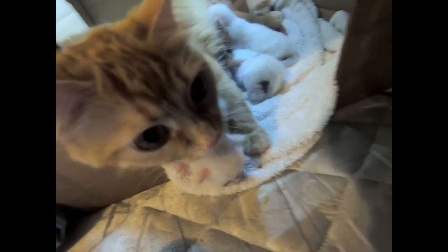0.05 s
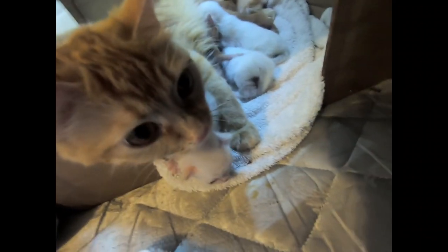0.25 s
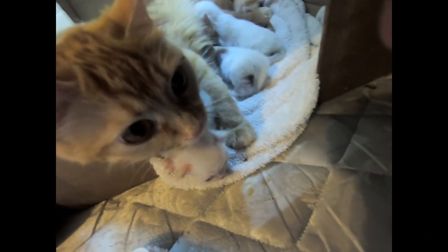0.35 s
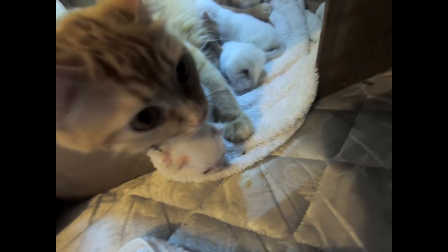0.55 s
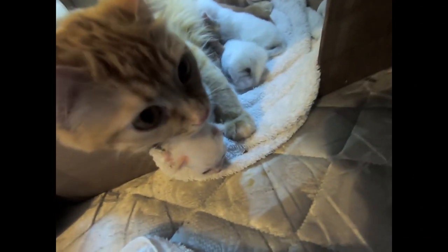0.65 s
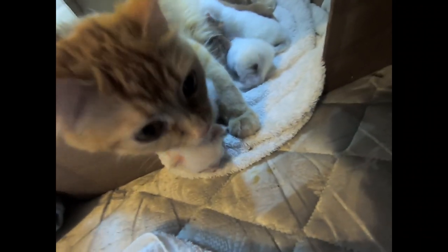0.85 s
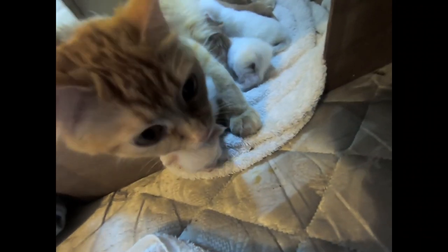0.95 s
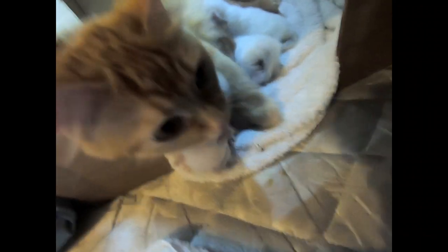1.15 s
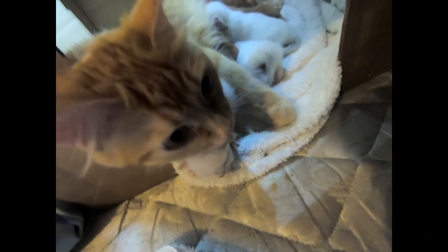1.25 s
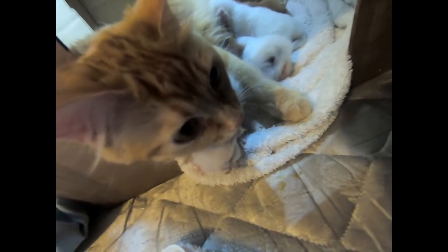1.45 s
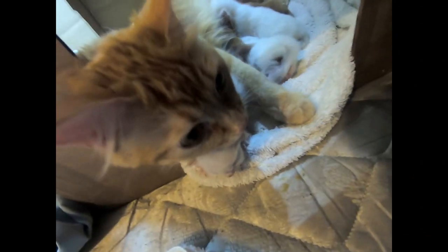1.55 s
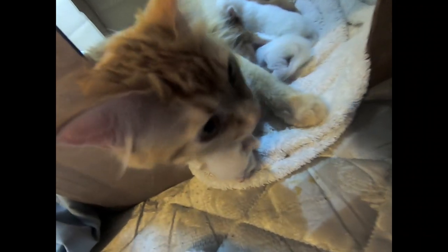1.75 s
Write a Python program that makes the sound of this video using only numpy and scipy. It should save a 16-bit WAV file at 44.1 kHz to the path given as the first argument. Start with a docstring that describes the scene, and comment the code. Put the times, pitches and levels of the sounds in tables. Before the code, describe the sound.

A cat purrs steadily and close in a quiet room; fingers rub, tap and snap the plastic case of the recording device, with low thumps mainly on the right, then handling stops and soft purring continues.

```python
"""Fingers rubbing a plastic camera case are heard first, over a cat's close purr in a quiet room. Friction is
modelled as lumpy filtered noise; snaps and taps as decaying sine modes of the case; thumps as low tones of
falling pitch, strongest in the right of two microphone ports. The purr is a train of pressure pulses ringing
the chest; once the hand is still, the purr, a rustle of bedding and the room remain, with one last faint snap."""
import sys
import numpy as np
from scipy import signal
from scipy.io import wavfile
from scipy.ndimage import uniform_filter1d

SR = 44100
rng = np.random.default_rng(int(sys.argv[2]) if len(sys.argv) > 2 else 0)


def volts_from_db(level):
    """Convert decibel levels to linear amplitude ratios."""
    exponent = np.asarray(level, float) / 20
    return 10 ** exponent


def file_out(sig):
    """Save sig as 16-bit WAV at sys.argv[1]."""
    # one column per channel
    cols = np.atleast_2d(sig).T
    # limit, then scale
    lim = np.clip(cols, -1, 1)
    pcm = np.round(lim * 32767).astype(np.int16)
    wavfile.write(sys.argv[1], SR, pcm)


N = 79380
TIME = np.arange(N) / SR  # s
EVENT_TIME = np.arange(9000) / SR  # s, span of one knock

# Spectra of the noises, each later scaled to a set rms: (frequency [Hz], relative level [dB])
ROOM_COLOUR = [(25, 7.5), (300, -13.5), (1150, -20.5), (1350, -1), (1600, -21), (2900, -14.5),
               (3600, -25.5), (5400, -25.5), (7200, -39), (16000, -60.5)]
RUMBLE_COLOUR = [(15, -1), (50, 1), (130, -8), (400, -41.5)]
CASE_LOW_COLOUR = [(150, -2.5), (350, 4), (560, 0), (850, -6.5), (1200, -36)]
CASE_HIGH_COLOUR = [(1000, -21.5), (1600, 3), (2000, -8.5), (2800, -24.5)]  # slides with the finger's place
SCRAPE_COLOUR = [(1500, -19), (2300, -6.5), (5000, -10), (7000, -21)]
HISS_COLOUR = [(5500, -8.5), (7400, -1.5), (9600, -4), (10500, -15.5), (15500, -35)]
BEDDING_COLOUR = [(1200, -6), (3800, -1), (7600, -6.5), (11000, -33.5)]
# Rumble of the grip in the right port: (time [s], level [dB])
GRIP_LEVEL = [(0, -35.5), (.25, -47.5), (.45, -24), (.66, -20), (.7, -42.5), (.73, -16), (.82, -23.5),
              (.87, -54), (.92, -15.5), (.96, -50), (1.19, -33), (1.27, -86)]
# Finger strokes: (start [s], length [s], low case tone [dB], high case tone [dB], scrape [dB],
# hiss [dB], high case tone frequency [Hz])
STROKES = [(-.02, 0.26, -59, -51, -56.5, -52.5, 1300), (0.192, 0.61, -67, -55, -66.5, -68, 1289),
           (0.424, 0.079, -57.5, -56.5, -63.5, -54.5, 1386), (0.537, 0.13, -50.5, -46, -54.5, -58.5, 1450),
           (0.599, 0.075, -47.5, -39.5, -59, -48.5, 1709), (0.712, 0.075, -32.5, -42, -51, -54.5, 1650),
           (0.872, 0.071, -40.5, -43.5, -54.5, -55.5, 1500)]
# Breaths of the purr: (nominal first pulse [s], end [s], mean pulse rate [Hz], roughness [0-1])
BREATHS = [(.008, .345, 30.7, .45), (.365, .93, 27.95, .15), (.957, 1.24, 31.5, .45),
           (1.2575, 1.6, 28.25, .1), (1.625, 1.8, 32, .6)]
# Relative level of each breath: (start level [dB], end level [dB])
BREATH_LEVELS = [(-45.5, -49.5), (-42.5, -40.5), (-53, -46), (-50, -56), (-54.5, -43)]
# Chest resonances rung by each pulse: (frequency [Hz], level re the pulse [dB], t60 [s])
CHEST_MODES = [(64, -14.5, 0.059), (119.6, -10, 0.14), (197.7, -12.5, 0.13), (475, -17.5, 0.028)]
# Sharp snaps: (time [s], peak level [dB]); the two faint rows are ticks about 10 ms ahead of a loud snap
SNAPS = [(0.2168, -12), (.9163, -22), (.927, 6.5), (1.0753, -29.5), (1.086, 1), (1.7787, -35.5)]
# Case modes in a snap: (frequency [Hz], relative level [dB], t60 [s], left re right [dB],
# left phase lead [rad])
SNAP_MODES = [(2150, -0.5, 0.002, 3.5, 1.62), (3400, -7, 0.0033, -2.5, 0.24),
              (4880, 1.5, 0.0028, -7.5, 1.87), (7320, -11.5, 0.0013, -2, 0.12)]
# Thin tones swelling into each snap: (frequency [Hz], level re the snap [dB])
THIN_TONES = [(3440, -31), (7260, -47), (7400, -42)]
# Air pushed into the right port: (time [s], decay level at onset [dB], signed factor [-], t60 [s])
THUMPS = [(0.2175, -15, 1, 0.36), (0.713, 7.5, -0.77, 0.01), (0.893, -2.5, -1.9, 0.012),
          (0.929, -4, 1, .055), (1.0867, 2.5, -0.46, 0.081), (1.176, -16, 1, 0.036)]
# Taps on the case: (time [s], decay level at onset [dB], frequency [Hz], t60 [s])
TAPS = [(0.2183, -9, 1241, 0.034), (0.627, -16, 1560, 0.013), (0.7109, 3.5, 1486, 0.0053),
        (.711, -10, 600, 0.0085), (.731, -15, 1570, 0.0065), (0.7505, -8.5, 1431, 0.0079),
        (.7495, -13.5, 603, 0.017), (.767, -21, 617, 0.023), (.787, -20.5, 566, 0.03),
        (0.8872, 12, 1412, 0.0026), (0.8917, 11.5, 1418, 0.0034), (0.985, -22, 1420, 0.0054),
        (1.0048, -16.5, 1520, 0.0041), (1.07, -15.5, 1524, 0.0036), (1.129, -15, 2360, 0.0014),
        (1.162, -19.5, 2130, 0.0051), (1.165, -29, 537, 0.05), (1.169, -8.5, 1565, 0.011),
        (1.173, -10, 1470, 0.012)]
# Rustle of the bedding: (time [s], level [dB])
BEDDING_LEVEL = [(1.088, -71.5), (1.155, -52), (1.17, -32.5), (1.182, -61), (1.32, -88.5), (1.75, -82.5),
                 (1.762, -67), (1.8, -62)]


def evened(x):
    """Normalisation: scales a signal to unit rms."""
    return x / np.sqrt(np.mean(abs(x) ** 2) + 1e-20)


def curve(points):
    """Linear interpolation of a time table, sample by sample."""
    rows = np.array(points)
    return np.interp(TIME, rows[:, 0], rows[:, 1])


def add(mix, s, sound):
    """Superposition: mixes a two-channel sound in at s seconds."""
    part = mix[:, round(s * SR):][:, :sound.shape[-1]]
    part += sound[..., :part.shape[1]]


def left_only(value):
    """Interchannel level or phase offset: a column giving the left port a value and the right port zero."""
    return np.array([[value], [0]])


def noise(colour, grain_db, grain_s):
    """Spectral shaping of modulated white noise, returned as an analytic signal of unit real rms."""
    width = max(int(grain_s * SR), 1)
    lumps = uniform_filter1d(rng.standard_normal(N), width)
    lumps = evened(uniform_filter1d(lumps, width))
    hz = np.fft.fftfreq(N, 1 / SR)
    f, db = np.transpose(colour)
    shape = volts_from_db(np.interp(np.log(abs(hz) + 1), np.log(f), db, -120, -120))
    shape = shape * (hz > 0)  # positive frequencies only
    lumpy = rng.standard_normal(N) * volts_from_db(grain_db * lumps)
    return np.sqrt(2) * evened(np.fft.ifft(np.fft.fft(lumpy) * shape))


def lead(hz):
    """Phase opposition: radians by which the left port leads when the case itself vibrates."""
    opposed_hz, turn_rad, turn_hz = 1300, 1.1, 300  # exactly opposed here, drifting off either side
    return np.pi + turn_rad * np.tanh((hz - opposed_hz) / turn_hz)


def room():
    """Diffuse background: steady coloured noise, alike in both ports."""
    room_db = -68.5  # rms
    return volts_from_db(room_db) * noise(ROOM_COLOUR, grain_db=1.2, grain_s=0.02).real


def grip_rumble():
    """Low-frequency contact noise: independent lumpy rumbles, far weaker in the left port."""
    left_db = -16.5
    pair = np.array([noise(RUMBLE_COLOUR, grain_db=3.5, grain_s=0.06).real for _ in range(2)])
    return pair * volts_from_db(curve(GRIP_LEVEL) + left_only(left_db))


def finger_strokes():
    """Friction excites case tones nearly out of phase at the ports, with separate scrape and hiss."""
    rise_s, fall_s = 0.015, 0.018
    case_apart = 0.57  # share of unrelated case tone added to the right port
    centre_hz = 1615  # high case tone before its slide
    rows = np.array(STROKES)
    start, end = rows[:, :1], rows[:, :1] + rows[:, 1:2]
    press = np.clip(np.minimum((TIME - start) / rise_s, (end - TIME) / fall_s), 0, 1)
    low, high, scrape, hiss, tone_hz = rows[:, 2:].T

    # Where strokes overlap, the louder one governs the slide
    weighted_slide = (volts_from_db(high) * (tone_hz - centre_hz)) @ press
    slide_hz = weighted_slide / (volts_from_db(high) @ press + 1e-9)
    turn = np.exp(-1j * lead(np.fft.fftfreq(N, 1 / SR)))
    out = np.zeros((2, N))
    for db, colour, shift_hz in ((low, CASE_LOW_COLOUR, 0 * TIME), (high, CASE_HIGH_COLOUR, slide_hz)):
        shift = np.exp(2j * np.pi * np.cumsum(shift_hz) / SR)
        shared, separate = (noise(colour, grain_db=4.5, grain_s=0.001) * shift for _ in range(2))
        right = np.fft.ifft(np.fft.fft(shared) * turn) + case_apart * separate
        out += np.array([shared.real, right.real]) * (volts_from_db(db) @ press)
    for db, colour in ((scrape, SCRAPE_COLOUR), (hiss, HISS_COLOUR)):
        pair = np.array([noise(colour, grain_db=4.5, grain_s=0.0049).real for _ in range(2)])
        out += pair * (volts_from_db(db) @ press)
    return out


def purr():
    """Pulse excitation: the larynx shuts about 30 times a second, each suck ringing the chest."""
    jitter, shimmer_db = 0.012, 1.2  # rms in periods and dB at no roughness; rougher breaths vary more
    swell_s = 0.022
    pulse_hz, rebound, ring_rise_s = 120, 1.3, 0.003
    clicks, murmur = np.zeros(N), np.zeros(N)
    for (start, end, rate_hz, rough), ends_db in zip(BREATHS, BREATH_LEVELS):
        chance = rng.standard_normal((24, 2)) * (1 + 5 * rough)
        at = start + (np.arange(24) + jitter * chance[:, 0]) / rate_hz
        keep = (at < end) & (at > 0)
        swell = np.clip(np.minimum(TIME - start, end - TIME) / swell_s + 0.5, 0, 1)
        level = volts_from_db(np.interp(TIME, [start, end], ends_db)) * swell
        index = np.minimum((at[keep] * SR).astype(int), N - 1)
        clicks[index] = level[index] * volts_from_db(shimmer_db * chance[keep, 1]) * (1 - rough)
        murmur += level * rough

    u = np.arange(-4000, 4001) / SR
    bell = (np.pi * pulse_hz * u) ** 2
    suck = -(1 - rebound * bell) * np.exp(-bell)
    ring = sum(volts_from_db(db - 60 * abs(u) / t60) * np.sin(2 * np.pi * hz * u) for hz, db, t60 in CHEST_MODES)
    ring = ring * np.clip(u / ring_rise_s, 0, 1) ** 2  # silent before the pulse
    breath = noise([(90, 0), (700, 6)], grain_db=4.0, grain_s=0.008).real
    airy = evened(signal.fftconvolve(breath, ring, "same"))
    return 3.56 * signal.fftconvolve(clicks, suck + ring, "same") + 0.96 * murmur * airy


def snaps():
    """Impulsive excitation: case modes and a noise tick decay together after thin swelling tones."""
    tick_db, tick_decay_s, tick_left_db = -14, 0.00088, -15
    thin_rise = 1150  # dB per s
    out, t = np.zeros((2, N)), EVENT_TIME
    before = t[::-1]  # time left until the snap
    for s, db in SNAPS:
        ring = 0
        for k, (hz, mode_db, t60, left_db, left_rad) in enumerate(SNAP_MODES):
            phase = 2 * np.pi * hz * t + np.pi * k + left_only(left_rad)  # modes alternate in sign
            ring = ring + volts_from_db(mode_db + left_only(left_db) - 60 * t / t60) * np.sin(phase)
        grit = uniform_filter1d(rng.standard_normal((2, len(t))), size=2)
        tick = volts_from_db(tick_db + left_only(tick_left_db)) * np.exp(-t / tick_decay_s) * grit
        crack = (ring + tick) * np.minimum(t / 0.00015, 1)
        add(out, s, crack / abs(crack).max() * volts_from_db(db))
        thin_tone = sum(volts_from_db(db + d - thin_rise * before) * np.sin(2 * np.pi * hz * before)
                     for hz, d in THIN_TONES)
        add(out, s - len(t) / SR, np.array([thin_tone, thin_tone]))
    return out


def thumps():
    """Air displacement: decaying low tones of falling pitch, strongest in the right port."""
    start_hz, sag_s, left_db = 102.6, 0.0049, -24  # pitch halves after sag_s
    out, t = np.zeros((2, N)), EVENT_TIME
    turns = start_hz * sag_s * np.log(1 + t / sag_s)
    for s, db, way, t60 in THUMPS:
        push = way * volts_from_db(db - 60 * t / t60) * np.sin(2 * np.pi * turns) * np.minimum(t / 0.0023, 1)
        add(out, s, push * volts_from_db(left_only(left_db)))
    return out


def taps():
    """Modal decay: each tap rings one case mode, the ports nearly opposed in phase."""
    rise_cycles = 1.2
    out, t = np.zeros((2, N)), EVENT_TIME
    for s, db, hz, t60 in TAPS:
        rise = np.sin(np.pi / 2 * np.minimum(t * hz / rise_cycles, 1)) ** 2
        tone = np.sin(2 * np.pi * hz * t - np.array([[0], [lead(hz)]]))
        add(out, s, rise * volts_from_db(db - 60 * t / t60) * tone)
    return out


def bedding():
    """Fabric friction: as the cat shifts, coloured noise swells alike in both ports."""
    return noise(BEDDING_COLOUR, grain_db=1.8, grain_s=0.002).real * volts_from_db(curve(BEDDING_LEVEL))


def scene():
    """Superposition of all that the two ports pick up."""
    handling = grip_rumble() + finger_strokes() + snaps() + thumps() + taps()
    return room() + handling + purr() + bedding()


def band_limit(x):
    """A steep low-pass at the top of the band."""
    return signal.sosfilt(signal.butter(12, 16600, fs=SR, output="sos"), x)


def record(dry):
    """Gain control: peaks over a threshold duck the level, which recovers; then a hard ceiling."""
    duck_from, duck_db, recover_db_per_s = 0.68, 4.5, 35
    ramp = TIME * recover_db_per_s
    hit_db = duck_db * (abs(dry).max(0) > duck_from)
    duck = np.maximum.accumulate(hit_db + ramp) - ramp
    smooth_duck = signal.lfilter(np.ones(900) / 900, 1, duck)  # mean of the last 900 samples
    mix = np.clip(dry / volts_from_db(smooth_duck), -1, 1)
    return band_limit(mix)


dry = scene()
out = record(dry)
file_out(out)
```